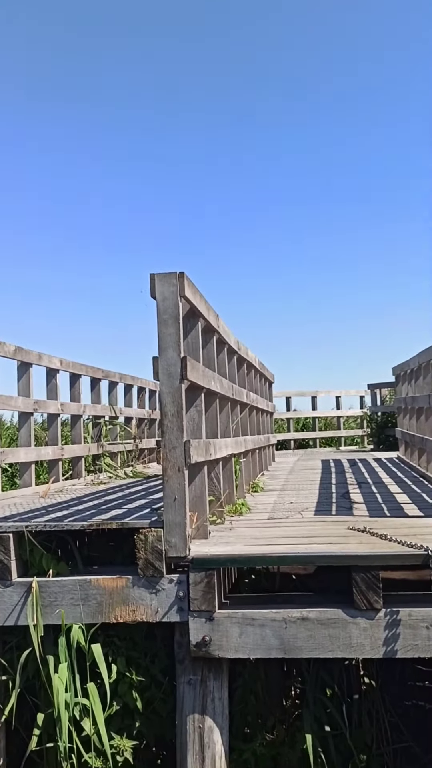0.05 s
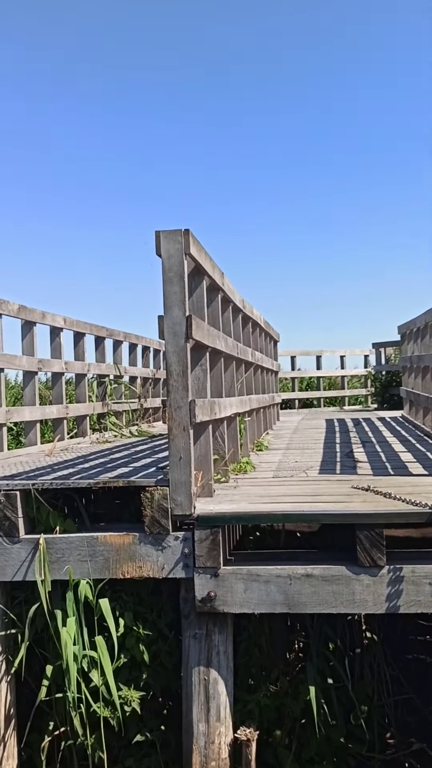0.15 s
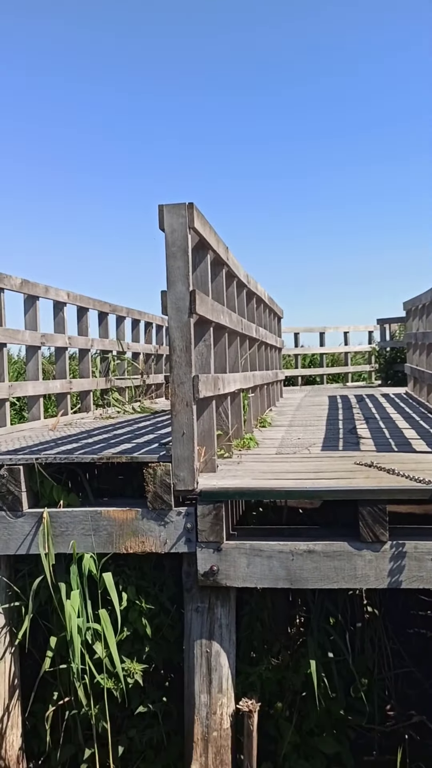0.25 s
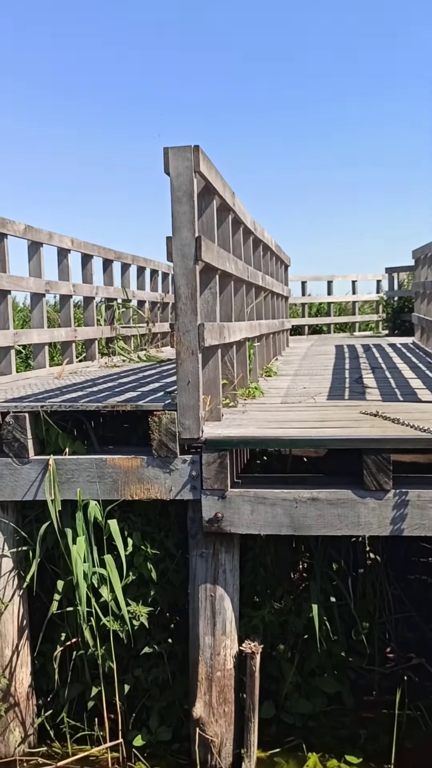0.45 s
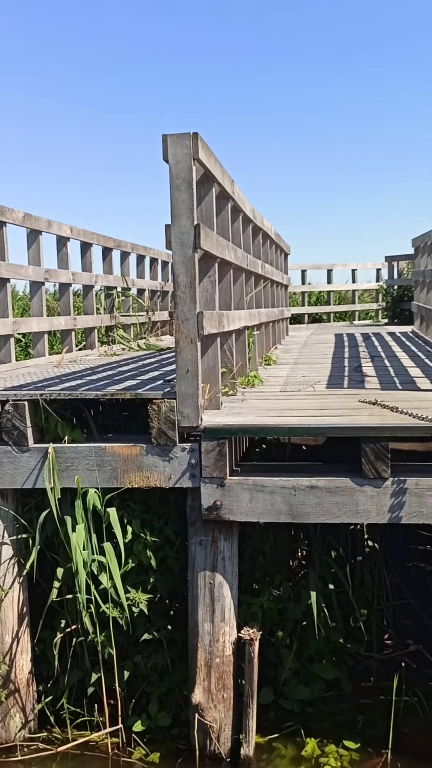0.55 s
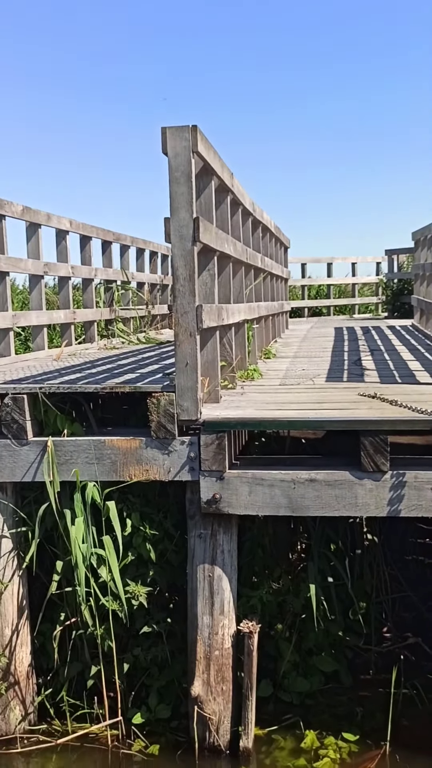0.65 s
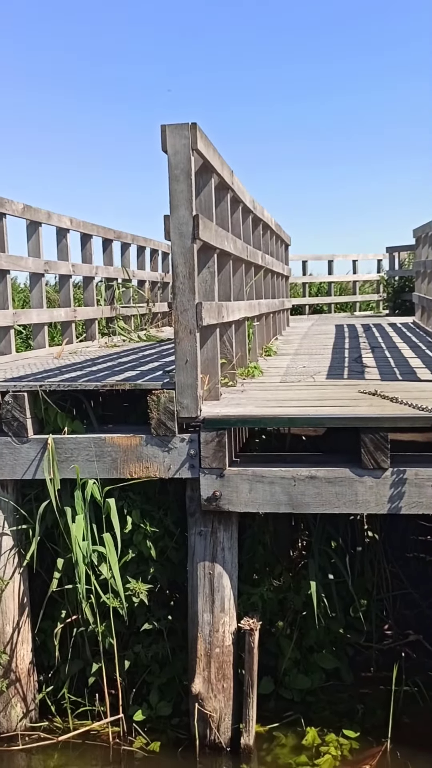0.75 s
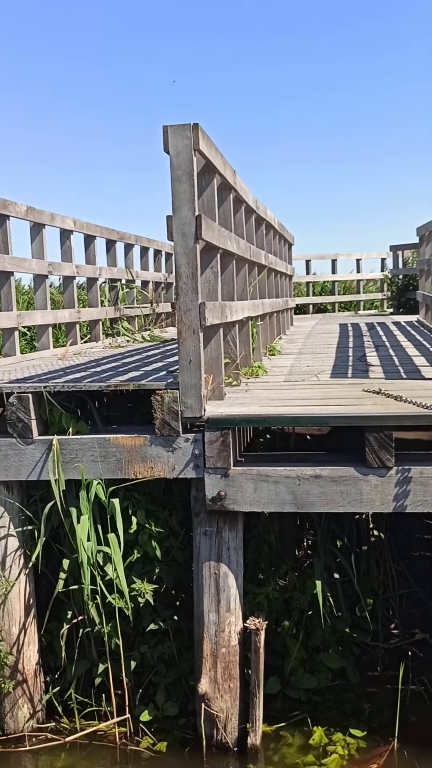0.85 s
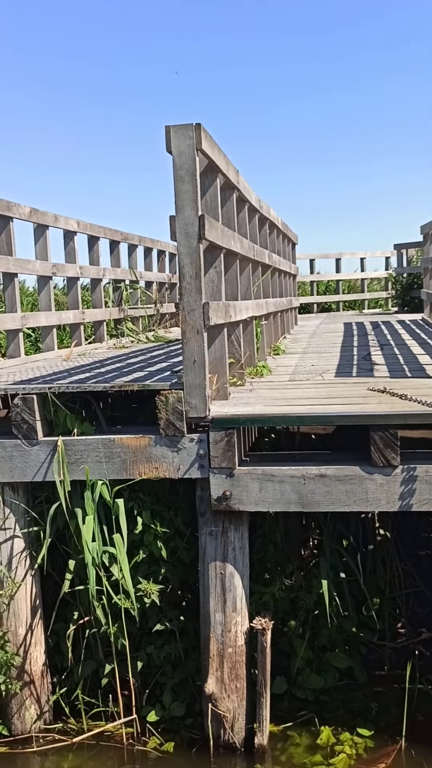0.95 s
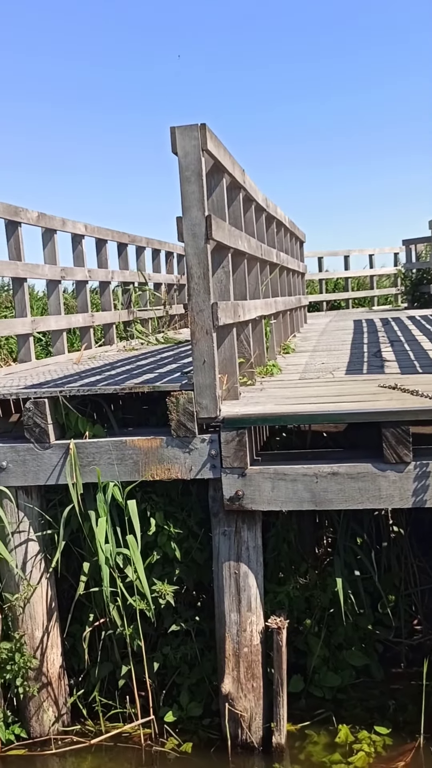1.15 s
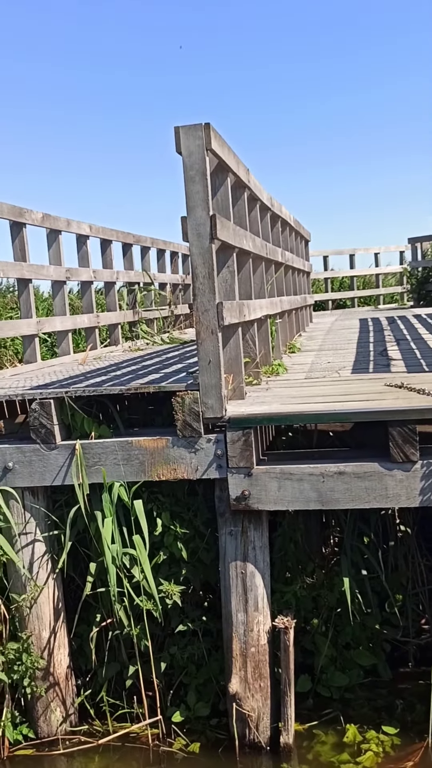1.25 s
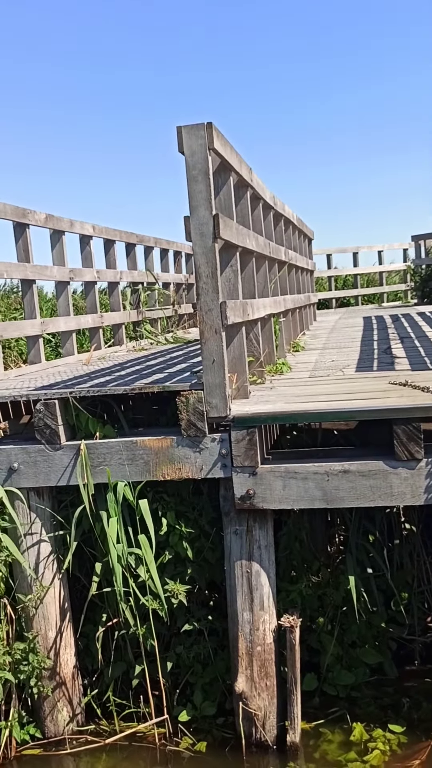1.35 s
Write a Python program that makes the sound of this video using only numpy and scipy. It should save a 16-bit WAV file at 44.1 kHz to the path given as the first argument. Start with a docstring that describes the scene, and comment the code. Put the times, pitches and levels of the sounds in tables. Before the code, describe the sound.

Metal chain links clash once outdoors, followed by faint clicks and dull wooden knocks.

```python
"""Steel chain by a river

A steel chain is handled beside a wooden boardwalk. Its links clash once in a quick, bright cluster
and ring out, then settle with light ticks, muted clacks and dull knocks on the wood. Soft thumps
and light wind reach the microphone, and a far bird chips twice over a quiet riverside hush."""
import sys
import numpy as np
from scipy import signal
from scipy.fft import rfft, irfft, next_fast_len
from scipy.io import wavfile
from scipy.ndimage import map_coordinates

SR = 44100
rng = np.random.default_rng(int(sys.argv[2]) if len(sys.argv) > 2 else 0)


def put_to_file(sound):
    """Save the sound as 16-bit audio at rate SR, in the file named by the first command-line argument."""
    columns = np.atleast_2d(sound).T  # one column per channel
    safe = np.clip(columns, -1, 1)
    whole_steps = np.round(safe * 32767)
    wavfile.write(sys.argv[1], SR, whole_steps.astype(np.int16))


N = 61739


def amp(db):
    """Turn decibels into a gain."""
    return 10 ** (np.asarray(db) / 20)


def unit(x):
    """Scale a signal to an average (rms) level of 1."""
    return x / np.sqrt(np.mean(x ** 2) + 1e-20)


def along(points, hz):
    """Read between (Hz, value) points on a log frequency axis."""
    freqs, values = np.transpose(points)
    return np.interp(np.log(hz + 1), np.log(freqs + 1), values)


def clock():
    """The time of each sample in seconds."""
    return np.arange(N) / SR


def fade(t, fade_s):
    """Die away by 60 dB in fade_s seconds, the "fade time"."""
    return amp(-60 * t / np.maximum(fade_s, 1e-4))


def filtered(x, gain):
    """Turn each frequency of x up or down by gain(hz)."""
    size = next_fast_len(N + 8192)
    return irfft(rfft(x, size) * gain(np.fft.rfftfreq(size, 1 / SR)), size)[:N]


def noise(tone, shape=lambda hz: 1):
    """Noise at level 1, coloured by a tone table and an optional extra shape."""
    return unit(filtered(rng.standard_normal(N), lambda hz: amp(along(tone, hz)) * shape(hz)))


def wobble(rate):
    """A smooth curve through `rate` random values a second."""
    return map_coordinates(rng.standard_normal(8192), [clock() * rate], mode="wrap")


def tilt(slope_db, hz, pivot_hz=7050):
    """A gain that tips the treble up or down by slope_db per octave."""
    return amp(slope_db * np.log2(np.clip(hz, pivot_hz / 2, TOP_HZ) / pivot_hz))


def add(out, start, x):
    """Mix x into out, beginning at start seconds."""
    i = max(round(start * SR), 0)
    out[i:] += x[:N - i]


# Link hitting link. Each row: start in seconds, level in dB, treble tilt in dB per octave.
CLASH_HITS = [(0.2123, -26, 2), (0.2162, -29, -1), (0.221, -34, -1), (.2290, -23.5, 2.5),
              (0.2324, -21, -1.5), (0.2375, -28.5, -0.5), (0.2416, -23, 0.5), (0.2497, -34, 0.5)]
# The tone of a hit's hard crack and of its echo. Each row: frequency in Hz, relative level in dB.
CRACK_TONE = [(500, -20), (2000, -5.5), (7000, 4), (14000, 4)]
ECHO_TONE = [(200, -15.5), (500, -2), (1000, -7), (1600, -1), (2300, -13.5), (4200, -9), (7500, -18),
             (14000, -36)]


def chain_clash():
    """Each hit cracks, sets the chain ringing and jangling, and echoes faintly off the surroundings."""
    out, t = link_ring(), clock()
    for start, db, slope_db in CLASH_HITS:
        crack = amp(6) * noise(CRACK_TONE) * fade(t, fade_s=0.015)
        echo = amp(-27) * noise(ECHO_TONE) * fade(t, fade_s=1.27)
        hit = amp(-4.5) * jangle() + crack + echo
        add(out, start, amp(db) * filtered(hit, lambda hz: tilt(slope_db, hz)))
    return out


# The notes of the slightly unlike links.
# Each row: pitch in Hz, relative level in dB, fade time in seconds.
LINK_NOTES = [(320, -28, .5), (460, -27, .5), (632, -25, .5), (1163, -20, .33), (1445, -19, .4),
              (1621, -21, .32), (1690, -14, .36), (1783, -23, .45), (1944, -23, .3), (3649, -13, .3),
              (3750, -16, .22), (3996, -15, .27), (4080, -15, .22), (4376, -17, .23), (4623, -16, .24),
              (4717, -14, .2), (6228, -15, .24), (6317, -15, .22), (6385, -10, .24), (6667, -17, .25),
              (6836, -12, .21), (7034, -10, .21), (7293, -14, .2), (7398, -11, .2), (7528, -13, .18),
              (7651, -15, .24), (8344, -15, .2), (8447, -9, .19), (12551, -16, .15), (12692, -17, .16)]


def link_ring():
    """Every hit feeds energy into the links' notes, which waver a little as they ring out."""
    out, t = np.zeros(N), clock()
    for hz, db, fade_s in LINK_NOTES:
        blows = np.zeros(N)
        for start, hit_db, slope_db in CLASH_HITS:
            blows[round(start * SR)] += (amp(hit_db) * tilt(slope_db, hz)) ** 2
        kept_per_sample = fade(1 / SR, fade_s) ** 2
        energy = signal.lfilter([1], [1, -kept_per_sample], blows)  # piles up, then drains away
        phase = 2 * np.pi * (hz * t + rng.random()) + 0.3 * wobble(rate=50.1)
        level = amp(db - 3 + 1.5 * rng.normal())
        out += level * np.sqrt(energy) * np.sin(phase)
    return out


# The tone of the jangle. Each row: frequency in Hz, relative level in dB.
JANGLE_TONE = [(100, -17), (250, -11.5), (500, -11), (850, -18.5), (1500, -1), (2300, -7), (4000, 4.5),
               (5500, 2.5), (7400, 7.5), (9500, -1), (13000, -5.5), (16000, -13)]
# How long the jangle lasts. Each row: frequency in Hz, fade time in seconds.
JANGLE_FADES = [(250, 0.37), (550, 0.68), (1500, 0.37), (3700, 0.29), (7500, 0.19), (14000, 0.21)]


def jangle():
    """The chain's many weaker notes blur into noise; the high ones die first."""
    hz, t, bands = signal.stft(noise(JANGLE_TONE), SR, nperseg=256)
    bands *= fade(t, along(JANGLE_FADES, hz)[:, None])
    _, sound = signal.istft(bands, SR, nperseg=256)
    return sound[:N]


# Slack links settling. Each row: start in seconds, level in dB.
CLACKS = [(.347, -52), (0.4428, -40), (0.4505, -39.5)]
# The tone of a clack. Each row: frequency in Hz, relative level in dB.
CLACK_TONE = [(200, -12), (500, 5), (1000, -2), (1600, 8.5), (2300, 1), (3100, 1.5), (4100, 5),
              (5200, -9.5), (7500, -11.5), (14000, -32)]


def link_clacks():
    """Links that lie against each other meet without ringing."""
    out, t = np.zeros(N), clock()
    for start, db in CLACKS:
        add(out, start, amp(db) * noise(CLACK_TONE) * fade(t, fade_s=0.07))
    return out


# Single links touching. Each row: start in seconds, level in dB, treble tilt in dB per octave.
TICKS = [(.031, -44.5, -15), (0.1226, -37, 7), (0.1294, -43, 6), (0.485, -46.5, -7), (.547, -58, -2),
         (0.6714, -46.5, -2), (.711, -54, -1), (.735, -53, 2), (0.9814, -43, -4.5), (1.0012, -57, 9),
         (1.0945, -41.5, 6), (1.109, -46.5, 2), (1.136, -44, 6), (1.143, -53, 5)]
# The tone of a tick. Each row: frequency in Hz, relative level in dB.
TICK_TONE = [(500, -13), (3000, -7), (7000, 3), (14000, -4)]


def link_ticks():
    """Links held in the hand touch briefly and barely ring."""
    out, t = np.zeros(N), clock()
    click_and_tail = fade(t, fade_s=0.0056) + amp(-22) * fade(t, fade_s=0.06)
    for start, db, slope_db in TICKS:
        tick = noise(TICK_TONE, lambda hz: tilt(slope_db, hz, pivot_hz=8000))
        add(out, start, amp(db) * click_and_tail * tick)
    return out


# Links shifting. Each row: middle in seconds, level in dB, half length in seconds.
SLIDES = [(.127, -54, 0.0097), (0.98, -57.5, 0.0092), (1.117, -56.5, .012), (1.136, -53, 0.011)]
# The tone of a slide. Each row: frequency in Hz, relative level in dB.
SLIDE_TONE = [(3000, -25), (7000, -4), (12000, -12), (14500, 14), (16000, 6)]


def link_slides():
    """Links slide over each other with a fine, grainy rasp."""
    t = clock()
    strokes = sum(amp(db) * np.exp(-((t - middle) / half) ** 2) for middle, db, half in SLIDES)
    rasp = noise(SLIDE_TONE) * amp(10 * wobble(rate=900))
    return strokes * unit(rasp)


# The chain knocking on wood.
# Each row: start in seconds, level in dB, treble cutoff in Hz, fade time in seconds.
KNOCKS = [(.003, -53, 690, 0.23), (.056, -52.5, 905, 0.078), (.347, -51, 1760, 0.12),
          (.452, -48, 1600, .16), (.677, -50, 1850, 0.083), (.7400, -51, 1990, 0.13), (.99, -53, 910, 0.16),
          (1.036, -56, 1700, .14), (1.0952, -49.5, 2580, 0.17), (1.1262, -41.5, 1820, 0.13),
          (1.143, -44.5, 900, 0.13), (1.343, -57.5, 583, .12)]
# The tone of the wood. Each row: frequency in Hz, relative level in dB.
WOOD_TONE = [(100, -27), (250, -5), (400, 2.5), (520, 6), (720, -4), (900, -5), (1200, -7), (1500, 1.5),
             (1850, 1.5), (2300, -9.5), (4000, -1), (5500, -11), (8000, -9), (15000, -10)]


def wood_knocks():
    """Struck timber gives a snap and a short, damped body; softer contacts are duller."""
    out, t = np.zeros(N), clock()
    snap = amp(-2.5) * fade(t, fade_s=0.0076)
    for start, db, cutoff_hz, fade_s in KNOCKS:
        wood = noise(WOOD_TONE, lambda hz: 1 / np.sqrt(1 + (hz / cutoff_hz) ** 6))
        add(out, start, amp(db) * wood * (fade(t, fade_s) + snap))
    return out


# Soft thumps. Each row: middle in seconds, level in dB, pitch in Hz, half length in seconds.
THUMPS = [(0.02, -36, 164, 0.0041), (.057, -36, 122, 0.0045), (0.123, -43, 104, 0.011),
          (0.21, -43, 113, 0.0087), (.252, -50, 220, 0.0072), (0.354, -39.5, 132, 0.0034),
          (0.436, -47, 91, 0.0091), (.574, -47.5, 132, 0.0052), (0.735, -48.5, 89, 0.014),
          (.868, -45, 125, 0.0059), (0.938, -33, 162, 0.0033), (1.149, -37.5, 102, .011),
          (1.23, -36, 115, .007)]


def handling_thumps():
    """Each thump is one short, low push and pull of air at the microphone."""
    out, t = np.zeros(N), clock()
    for middle, db, hz, half in THUMPS:
        swell = np.exp(-((t - middle) / half) ** 2)
        out += amp(db) * swell * np.sin(2 * np.pi * hz * (middle - t))
    return out


# A bird's double chip. Each row: middle in seconds, level in dB.
CHIPS = [(.635, -54), (0.65, -58)]


def bird(pitch_hz=2820, fall_hz_per_s=18000, half_length_s=0.0033):
    """A small, distant bird gives very short, slightly falling whistles."""
    out = np.zeros(N)
    for middle, db in CHIPS:
        t = clock() - middle
        swell = np.exp(-(t / half_length_s) ** 2)
        phase = 2 * np.pi * t * (pitch_hz - fall_hz_per_s * t / 2)
        out += amp(db) * swell * np.sin(phase)
    return out


# How the wind and the wash rise and fall. Each row: time in seconds, level in dB.
WIND_LEVELS = [(0, -47), (.1, -53), (.16, -59), (.45, -61.5), (.68, -62), (.8, -63), (1.0, -57),
               (1.11, -57.5), (1.19, -47.5), (1.29, -50.5), (1.33, -64), (1.4, -61.5)]
WASH_LEVELS = [(0, -52), (.13, -59.5), (.175, -52.5), (.25, -59), (.5, -53.5), (.8, -57), (.92, -60),
               (1.06, -57.5), (1.18, -59), (1.25, -68.5), (1.4, -66.5)]
# The tones of wind, wash and hush. Each row: frequency in Hz, relative level in dB.
WIND_TONE = [(25, -27), (42, -31), (60, -7.5), (82, -0.5), (125, -2.5), (200, -8), (350, -33), (900, -48.5)]
WASH_TONE = [(60, -30), (200, -2.5), (420, 0.5), (680, -2.5), (900, -11), (1550, -7.5), (2200, -18.5),
             (5000, -22.5), (12000, -60)]
HUSH_TONE = [(50, -14), (400, -1.5), (1000, -2), (2500, -4.5), (4300, 0), (7300, -0.5), (8300, -7.5),
             (12500, -13.5), (15800, -6.5)]


def riverside():
    """Wind buffets the microphone over a low wash of water and rustling and a hush of reeds and air."""
    level = lambda rows: amp(np.interp(clock(), *np.transpose(rows)))
    wind = level(WIND_LEVELS) * noise(WIND_TONE)
    wash = level(WASH_LEVELS) * noise(WASH_TONE)
    hush = amp(-64) * noise(HUSH_TONE)
    return wind + wash + hush


def scene():
    """All the sounds meet at one microphone."""
    chain = chain_clash() + link_clacks() + link_ticks() + link_slides()
    return (chain + wood_knocks() + handling_thumps() + bird() + riverside())[None]


# The microphone's tone. Each row: frequency in Hz, gain in dB.
MIC_TONE = [(30, -8), (70, 0.5), (4700, 0), (4950, -9.5), (5900, -7.5), (6250, 1), (8450, 1), (8750, -9.5),
            (9900, -18), (11400, -18.5), (11700, -0.5)]
TOP_HZ, TOP_EDGE_HZ = 16200, 900  # the highest frequency let through, and the width of the slope below


def record(dry):
    """The microphone thins the deep bass, dips the treble in two places and cuts off the very top."""
    top_cut = lambda hz: np.clip((TOP_HZ - hz) / TOP_EDGE_HZ, 0, 1)
    return filtered(dry[0], lambda hz: amp(along(MIC_TONE, hz)) * top_cut(hz))[None]


dry = scene()
out = record(dry)
put_to_file(out)
```